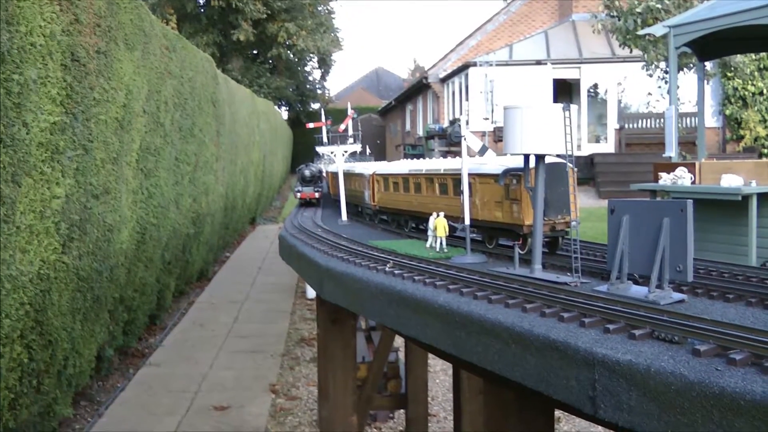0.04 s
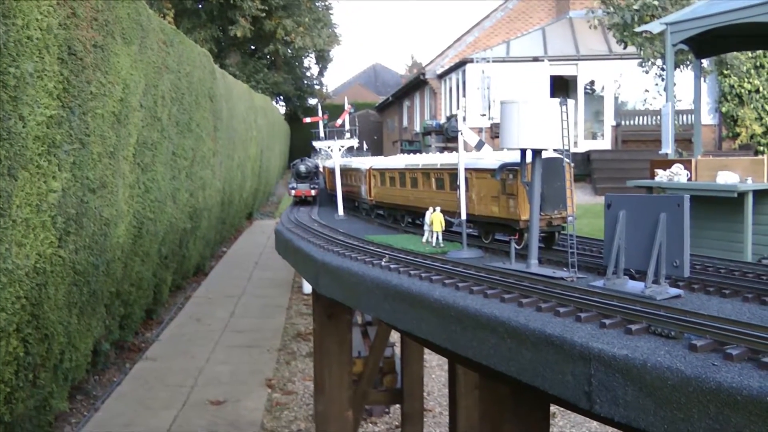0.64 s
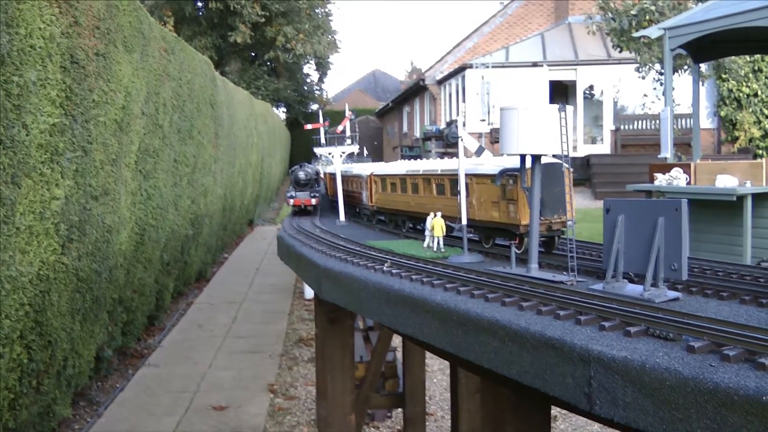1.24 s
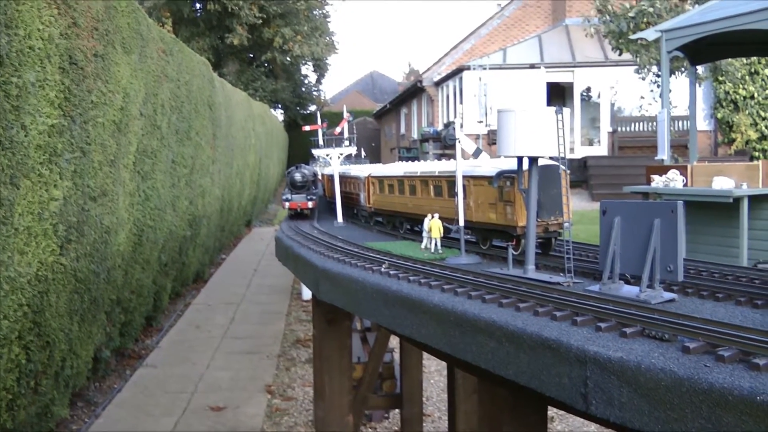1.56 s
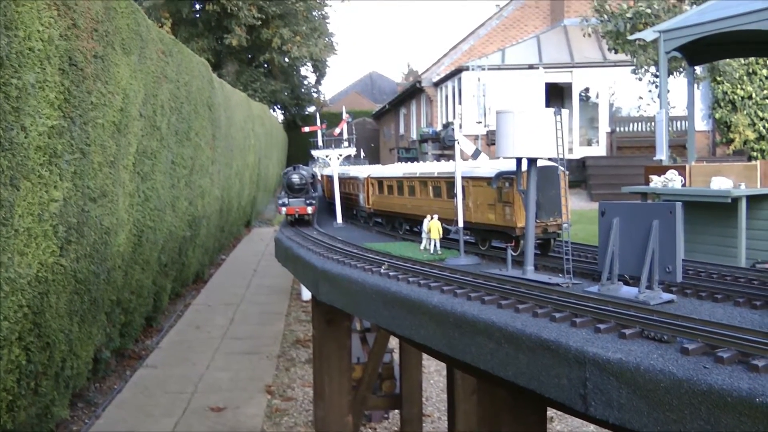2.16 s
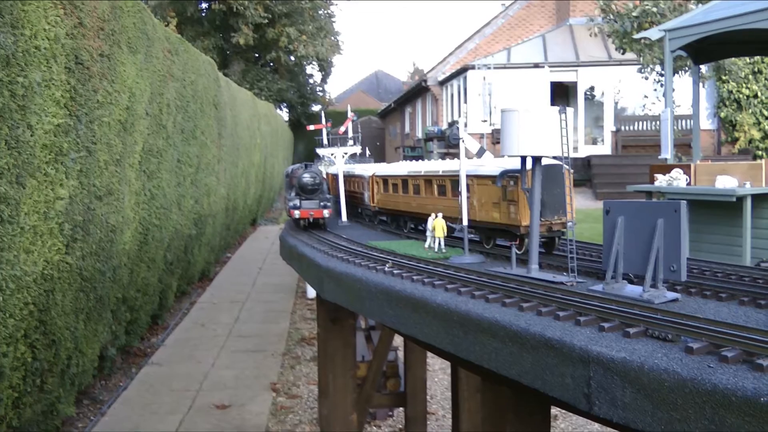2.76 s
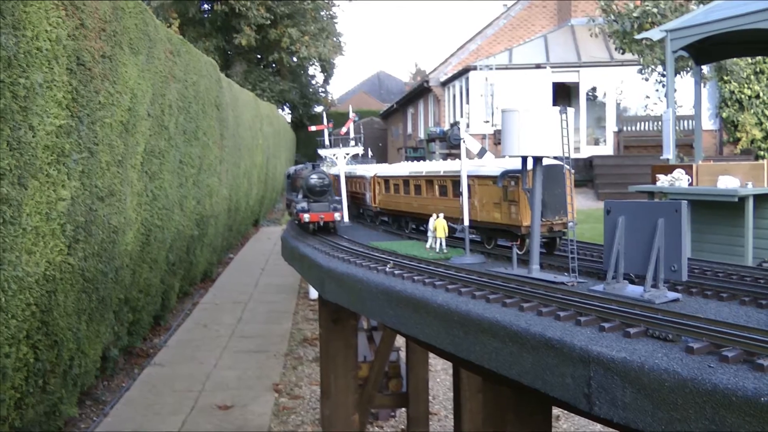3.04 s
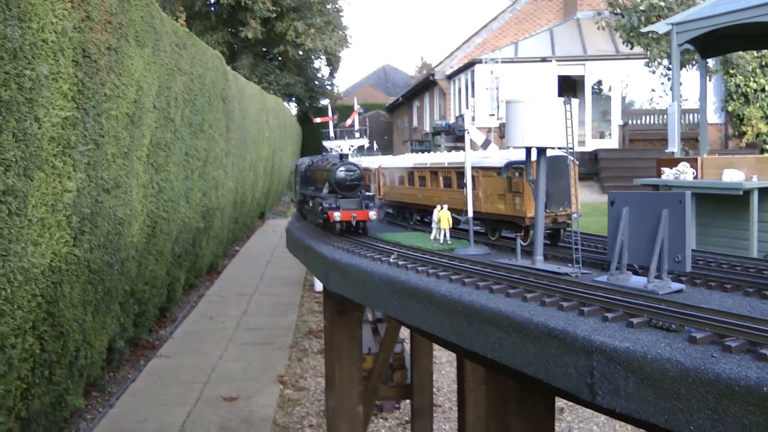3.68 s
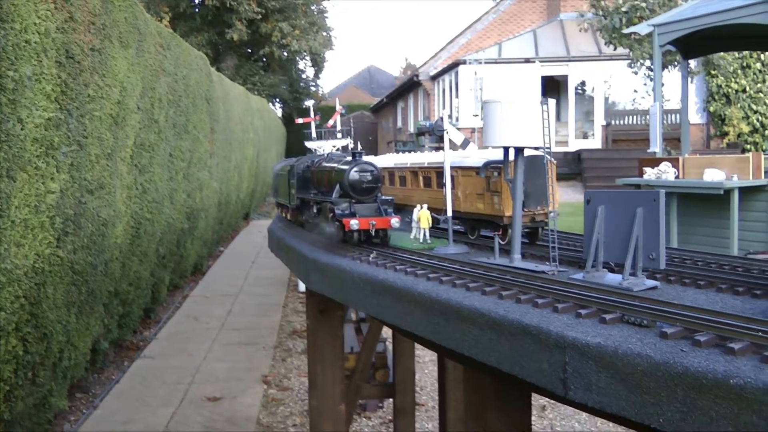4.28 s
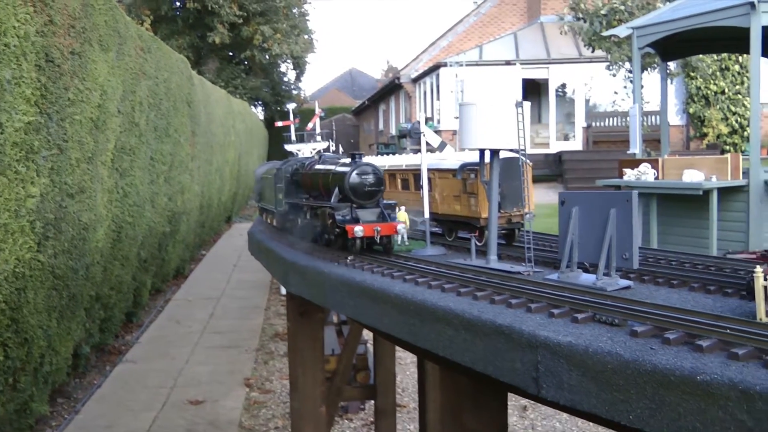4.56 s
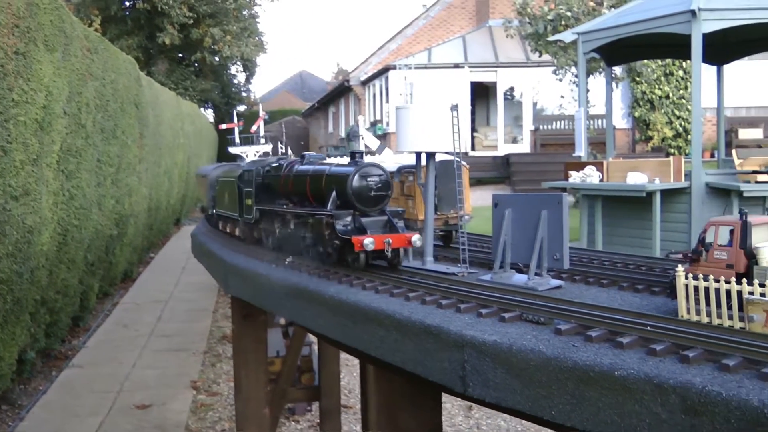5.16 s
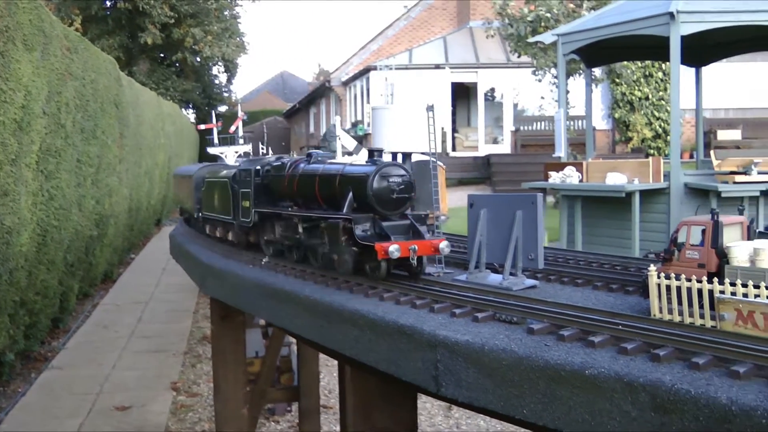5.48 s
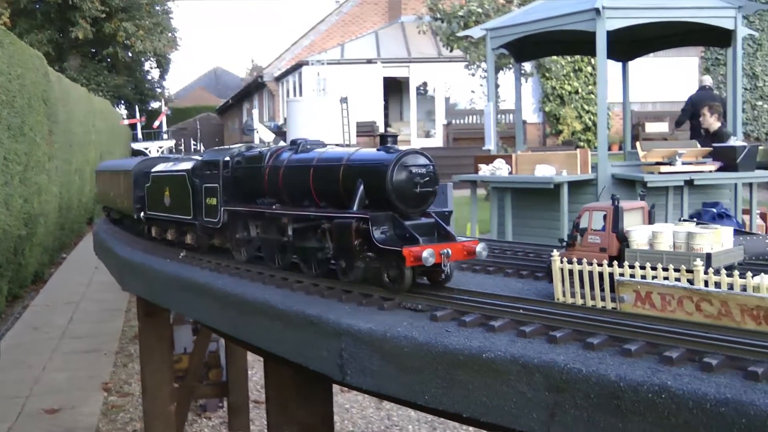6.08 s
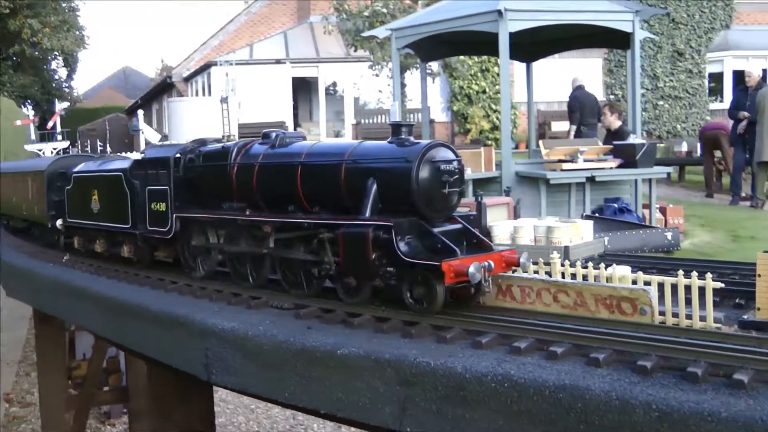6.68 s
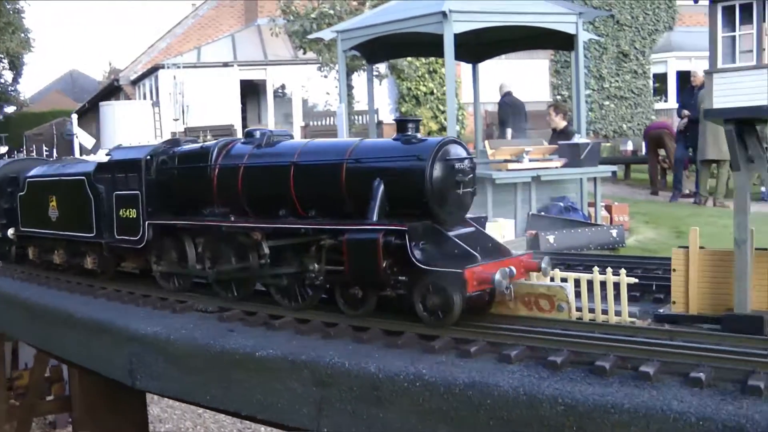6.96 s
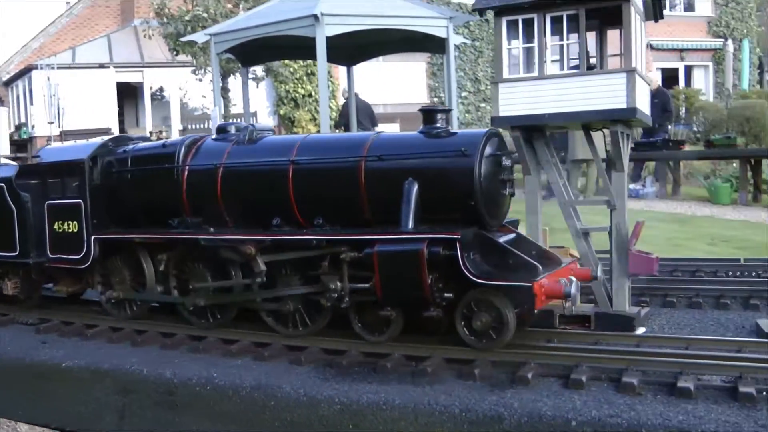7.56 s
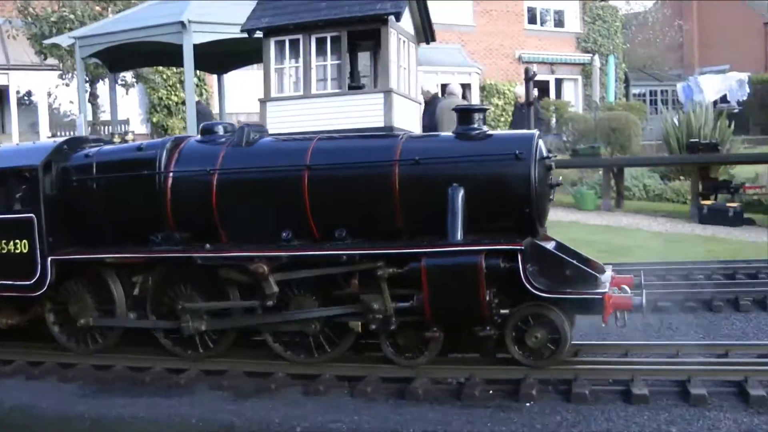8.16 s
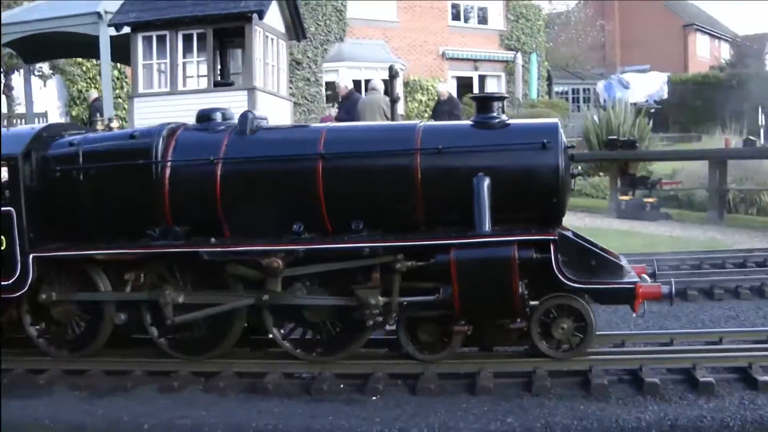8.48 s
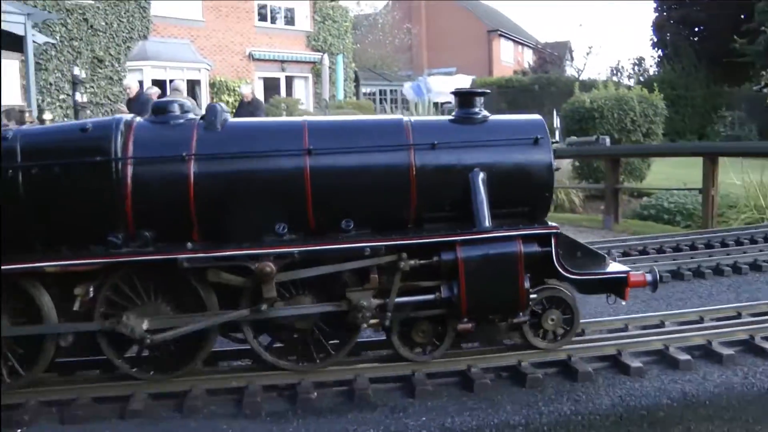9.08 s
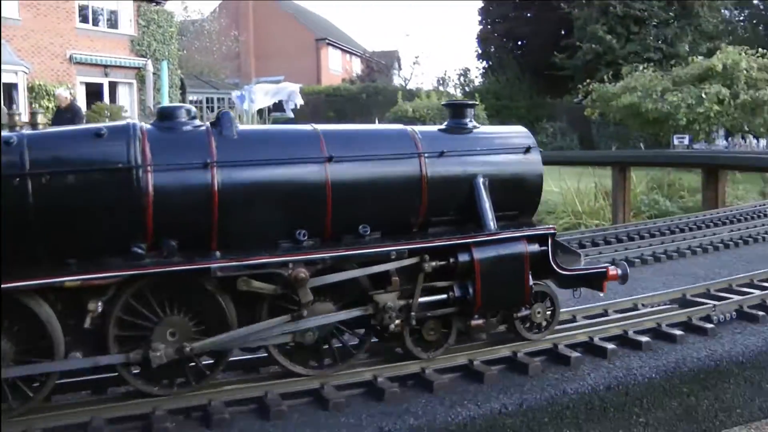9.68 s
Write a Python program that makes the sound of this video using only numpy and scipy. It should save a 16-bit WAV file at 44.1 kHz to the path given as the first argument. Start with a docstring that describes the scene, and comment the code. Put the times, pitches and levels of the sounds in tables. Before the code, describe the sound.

Steam hiss, a high wavering burner tone and soft chuffs grow louder as a model locomotive rolls past along a garden track.

```python
"""A model live-steam locomotive comes round a garden railway, through open air and a faint, dying wind.
From the start its burner roars and sings in the flue, steam hisses, and soft exhaust beats ride on the
rumble of the wheels. While it is far off, a grazing reflection from the track bed sweeps down through
the hiss. It grows louder and brighter, knocking over rail joints as its beat slackens. A thin steam jet
sweeps past just before the chimney draws level at about 8 s, and the flue's note sinks a little."""
import sys
import numpy as np
from scipy import signal
from scipy.fft import rfft, irfft, next_fast_len
from scipy.io import wavfile
from scipy.ndimage import uniform_filter1d

SR = 44100
rng = np.random.default_rng(int(sys.argv[2]) if len(sys.argv) > 2 else 0)


def master(y):
    """Save y as 16-bit WAV."""
    cut = np.clip(np.atleast_2d(y).T, -1, 1)
    pcm = np.round(cut * 32767)  # scale
    wavfile.write(sys.argv[1], SR, pcm.astype(np.int16))


N = 433503
HOP = 128
TIME = np.arange(N) / SR
FRAME_S = np.arange(N // HOP + 9) * HOP / SR
BIN_HZ = np.fft.rfftfreq(8 * HOP, 1 / SR)


def gain_of(db):
    """Decibels to amplitude."""
    return 10 ** (np.asarray(db) / 20)


def unit_rms(x):
    """Scales to unit rms."""
    return x / np.sqrt(np.mean(x ** 2) + 1e-20)


def over_time(rows, s=TIME):
    """The columns of an automation curve at the times s."""
    at, *columns = np.transpose(rows)
    return [np.interp(s, at, c) for c in columns]


def over_hz(rows):
    """The columns of a spectrum at every bin."""
    hz, *columns = np.transpose(rows)
    return [np.interp(np.log(BIN_HZ + 1), np.log(hz + 1), c) for c in columns]


def colour(rows):
    """An EQ curve as a gain for every bin."""
    return gain_of(over_hz(rows)[0])


def wander(rate_hz):
    """Random drift of unit rms, with little above the given rate."""
    size = next_fast_len(N)
    hz = np.fft.rfftfreq(size, 1 / SR)
    spectrum = rfft(rng.standard_normal(size)) / (1 + (hz / rate_hz) ** 2)
    return unit_rms(irfft(spectrum, size)[:N])


def patches(depth_db, size):
    """Random gain over time and frequency, in patches of size (frames, bins)."""
    field = rng.standard_normal((len(FRAME_S), len(BIN_HZ)))
    field = uniform_filter1d(field, size[0], axis=0)
    field = uniform_filter1d(field, size[1], axis=1)
    return gain_of(depth_db * unit_rms(field))


def swells(rows):
    """A level ride in dB made of smooth humps."""
    return sum(db * np.exp(-(2 * (TIME - middle) / length) ** 2) for middle, length, db in rows)


def beats(rows, rise_s, hold_s, fall_s):
    """One attack, hold and release for each row of t/s, level/dB."""
    out, t = np.zeros(N), np.arange(SR // 4) / SR
    envelope = (1 - np.exp(-t / rise_s)) * np.exp(-np.maximum(t - hold_s, 0) / fall_s)
    for s, db in rows:
        part = out[round(s * SR):][:len(t)]
        part += gain_of(db) * envelope[:len(part)]
    return out


def stereo_noise(shape):
    """Noise of a given short-time spectrum at two microphone ports; their mean has unit rms."""
    # stereo image of the ports: f/Hz, likeness/0-1, left lead/rad, left over right/dB
    ports = [(60, 0.4, 1, -2.5), (200, 0.93, 0.5, 5), (550, 0.67, 0.2, 3), (1400, 1, 0.84, .7),
             (2550, 0.86, 0, 0.5), (3170, 0.61, 0, -3), (3930, 0.98, 0.71, 0.4), (4450, 0.55, 0.9, -5),
             (5720, 0.44, 2.5, 2), (7000, 0.4, 0, 4), (8700, 0.26, 2, -4), (9740, 1, 1.5, -1),
             (12000, 0.57, 4, 1.5), (13200, 0, 5.5, -2), (14800, 0.85, 3.5, 2)]
    same, lead, side_db = over_hz(ports)
    same, tilt = np.clip(same, 0, .99), gain_of(side_db / 2)
    a, b = rng.standard_normal((2, len(FRAME_S), len(BIN_HZ), 2)).view(complex)[..., 0]
    left = a * tilt
    right = (same * a + np.sqrt(1 - same ** 2) * b) * np.exp(-1j * lead) / tilt
    mono_gain = np.sqrt(tilt ** 2 + tilt ** -2 + 2 * same * np.cos(lead))
    spectra = np.array([left, right]) * (shape / mono_gain)
    x = signal.istft(spectra.swapaxes(1, 2), nperseg=8 * HOP, noverlap=7 * HOP)[1][:, :N]
    return x / x.mean(0).std()


def nearness(behind_m, closest_m, speed_m_per_s=0.39, abreast_s=8.21):
    """Inverse-distance gain of a part that rides behind the chimney, 1 at its closest."""
    along_m = speed_m_per_s * (TIME - abreast_s) - behind_m
    return closest_m / np.hypot(closest_m, along_m)


def track_bed(height, share):
    """A grazing reflection arrives inverted; its notches slide down as the extra path grows."""
    # the reflection: t/s, delay at the flue's height/ms, strength/0-1, scattered above f/Hz
    reflection = [(0, .265, .5, 5500), (1.2, .275, .55, 6000), (2.1, .295, .55, 9000),
                  (2.5, .33, .55, 10000), (3.2, .44, .5, 9500), (3.9, .55, .38, 6500), (5.5, .8, .05, 6500),
                  (9.83, 1.2, .03, 6500)]
    delay_ms, strength, scatter_hz = (c[:, None] for c in over_time(reflection, FRAME_S))
    delay_s = height * delay_ms / 1000  # height is 1 at the flue's mouth
    echo = share * strength / (1 + (BIN_HZ / scatter_hz) ** 6)  # sleepers and grit scatter the top
    return abs(1 - echo * np.exp(-2j * np.pi * BIN_HZ * delay_s)) / np.sqrt(1 + echo ** 2)


def garden(air_db=-44.0, swell_db=1.5, wind_db=-74, lull_db_per_s=1.0, lumps_db=7.0):
    """The soft wash of the open air, and faint lumps of a dying wind on the microphone."""
    # midrange wash of the air: f/Hz, level/dB
    air_eq = [(30, -32), (95, -37), (140, -19), (200, -4), (290, -3.5), (520, 4), (900, 4.5), (1500, 5),
              (2400, -12.5), (4500, -9), (16000, -49)]
    # low wind rumble: f/Hz, level/dB
    wind_eq = [(12, 10), (35, -4), (60, -9), (100, -23), (200, -32), (800, -70)]
    # light gusts: middle t/s, length/s, lift/dB
    gusts = [(1.15, .5, 3.5), (1.88, .25, 5), (9.8, 0.55, 11)]
    air = stereo_noise(colour(air_eq)) * gain_of(air_db + swell_db * wander(9))
    level_db = wind_db - lull_db_per_s * TIME + swells(gusts) + lumps_db * wander(8.6)
    return air + stereo_noise(colour(wind_eq)) * gain_of(level_db)


def low_cut(x, lowest_hz=150):
    """A steep low cut that takes the deep bass out of the puffs and the rolling rumble."""
    return signal.sosfilt(signal.butter(6, lowest_hz, "highpass", fs=SR, output="sos"), x)


def wheels(roll_db=-34, bump_db=1.4, ring_width_hz=190):
    """Uneven rolling rumble, and low thumps from rail joints and one heavy exhaust beat, ring the boards under
    the track."""
    # rolling rumble: f/Hz, level/dB
    roll_eq = [(70, -55), (120, -33), (180, -15), (260, -2.5), (400, 0.5), (520, 0.5), (610, -1.5),
               (800, -2), (1150, -1.5), (1600, -5.5), (2800, -17), (6000, -38)]
    # the boards ring lower along the curve: t/s, f/Hz, lift/dB
    boards = [(0, 950, -4), (3.8, 795, 6), (6, 696, 3.5), (7.4, 770, 2), (9.83, 780, -3)]
    # low thumps, two rail-joint knocks and one heavier exhaust beat: t/s, level/dB
    thumps = [(2.927, -42), (6.374, -38), (8.515, -36)]
    ring_hz, lift_db = (c[:, None] for c in over_time(boards, FRAME_S))
    ring = gain_of(lift_db / (1 + (2 * (BIN_HZ - ring_hz) / ring_width_hz) ** 2))
    rumble = stereo_noise(colour(roll_eq) * ring * patches(2.2, size=(70, 2)))
    rolling = gain_of(roll_db + bump_db * wander(45)) * nearness(behind_m=0.76, closest_m=0.86)
    thumping = beats(thumps, rise_s=0.0013, hold_s=0.059, fall_s=0.028)
    return rumble * np.hypot(rolling, thumping)


def strokes(count=64, first_s=.098, gap_s=.14299, gap_growth_s=.000482):
    """The slowly slackening exhaust rhythm, as rows of t/s, accent/dB."""
    # four beats to a wheel turn, uneven as the valves are set: lateness/s, accent/dB
    valves = [(0.0036, -5.3), (0.0042, -5.5), (-0.015, -2.5), (-0.017, -6)]
    k = np.arange(count)
    late_s, accent_db = np.array(valves)[k % len(valves)].T
    return np.transpose([first_s + gap_s * k + gap_growth_s * k ** 2 / 2 + late_s, accent_db])


def exhaust(puff_db=-29):
    """Short hollow puffs from the chimney, each a little different in colour, plainest from the side."""
    # hollow body of a puff: f/Hz, level/dB
    puff_eq = [(90, -60), (150, -39), (210, -6), (280, 9.5), (380, 3), (520, 0), (750, -4.5), (1100, -6),
               (2000, -6.5), (5000, -24)]
    puffs = stereo_noise(colour(puff_eq) * patches(1.2, size=(40, 3)))
    puffs *= beats(strokes(), rise_s=.006, hold_s=.034, fall_s=.014)
    return puffs * gain_of(puff_db) * nearness(behind_m=0, closest_m=1.03) ** 2


def steam_leaks(hiss_db=-30.5, dull_hz=9800, dull_db=5.0, sputter_db=0.5):
    """Steady leaks hiss, and brighten as they near."""
    # leaking steam: f/Hz, level/dB
    hiss_eq = [(2000, -75), (4300, 2.5), (5400, -6), (6300, -6.5), (7050, 2), (7600, 0), (8200, -0.5),
               (8900, -4.5), (10000, -7), (11000, -6), (12200, -7), (13500, -17.5), (15000, -6.5),
               (16000, -36)]
    near = nearness(behind_m=0.096, closest_m=0.67)
    far = 1 - np.interp(FRAME_S, TIME, near)[:, None]
    top = 1 - 1 / (1 + (BIN_HZ / dull_hz) ** 10)
    tone = colour(hiss_eq) * gain_of(-dull_db * far * top) * track_bed(height=.95, share=1)
    hiss = stereo_noise(tone * patches(1.62, size=(24, 10)))
    return hiss * gain_of(hiss_db + sputter_db * wander(13)) * near


def steam_jet():
    """A thin, bright jet of steam points at the listener for a moment."""
    # sizzle of the jet: f/Hz, level/dB
    jet_eq = [(4000, -30), (8500, -19), (10500, 10), (12800, 5), (14000, -4), (16000, -9)]
    # the jet sweeping past: t/s, level/dB
    sweep = [(0, -65), (6.8, -43.5), (7.45, -42), (7.65, -38.5), (7.85, -35), (7.97, -65), (9.83, -65)]
    return stereo_noise(colour(jet_eq)) * gain_of(over_time(sweep)[0])


def burner(roar_db=-27.0, flicker_db=.5):
    """The flame roars; each exhaust beat chokes the roar a little."""
    # roar of the flame: f/Hz, level/dB
    roar_eq = [(300, -64), (900, -34), (1500, -1.5), (2300, 3.5), (3300, 5.5), (4200, 0), (5000, -14),
               (6000, -8.5), (9000, -33)]
    # ducking by the beats, plainest from the side: t/s, depth/dB
    choke_depth = [(0, -0.5), (8.2, 2), (8.8, 4)]
    choke = beats([(s, 0) for s, _ in strokes()], rise_s=0.0065, hold_s=0.025, fall_s=0.085)
    draught_db = -over_time(choke_depth)[0] * (choke - uniform_filter1d(choke, SR // 4))
    tone = colour(roar_eq) * track_bed(height=1.12, share=0.59)
    roar = stereo_noise(tone * patches(0.96, size=(25, 6)))
    level_db = roar_db + draught_db + flicker_db * wander(30)
    return roar * gain_of(level_db) * nearness(behind_m=0.13, closest_m=0.58)


def flue(sing_db=-22, width_hz=235, steepness=1.145, waver_hz=52, unrest_db=0.64, flutter_db=0.05):
    """The flame excites a wavering flue resonance, coloured by the track bed's sliding notches."""
    # the note sinks as the engine draws level: t/s, f/Hz
    note = [(0, 3870), (5.2, 3850), (8.3, 3805), (9.83, 3750)]
    # the note flares up or falters: middle t/s, length/s, change/dB
    flares = [(.56, 0.13, 1.5), (1.12, 0.14, -6), (1.48, .06, 2.5), (1.78, 0.22, 2.5), (3.75, 0.98, -1),
              (4.17, 0.12, 4), (4.54, 0.076, -4), (4.63, 0.066, 3), (4.89, 0.13, 3), (5.02, 0.09, -3.5),
              (5.2, 0.11, 3), (5.35, 0.069, 7), (6.16, 0.085, 4.5), (7.02, 0.11, 2.5), (7.69, 0.22, -5.5),
              (8.15, 0.083, 5.5), (8.33, 0.02, 7), (8.98, .06, 2.5), (9.28, 0.054, 4), (9.58, 0.043, -5)]
    pitch_hz = over_time(note, FRAME_S)[0] + waver_hz * np.interp(FRAME_S, TIME, wander(7.1))
    detune = (BIN_HZ - pitch_hz[:, None]) / (width_hz / 2)
    skirt = np.where(detune > 0, 3, 6)  # the resonance falls faster on its high side
    resonance = (1 + detune ** 2) ** (-steepness / 2) / np.sqrt(1 + (detune / skirt) ** 2)
    level_db = sing_db + swells(flares) + unrest_db * wander(14) - flutter_db * wander(55)
    singing = stereo_noise(resonance * track_bed(height=1, share=0.83))
    return singing * gain_of(level_db) * nearness(behind_m=0.18, closest_m=0.56)


def scene():
    """The locomotive in the garden."""
    return flue() + burner() + steam_leaks() + steam_jet() + low_cut(exhaust() + wheels()) + garden()


def record(dry):
    """The camera's band limit: a steep cut of the very top."""
    lowpass = signal.firwin(1023, 15780, window=("kaiser", 9), fs=SR)
    return signal.oaconvolve(dry, lowpass[None], "same")


dry = scene()
out = record(dry)
master(out)
```